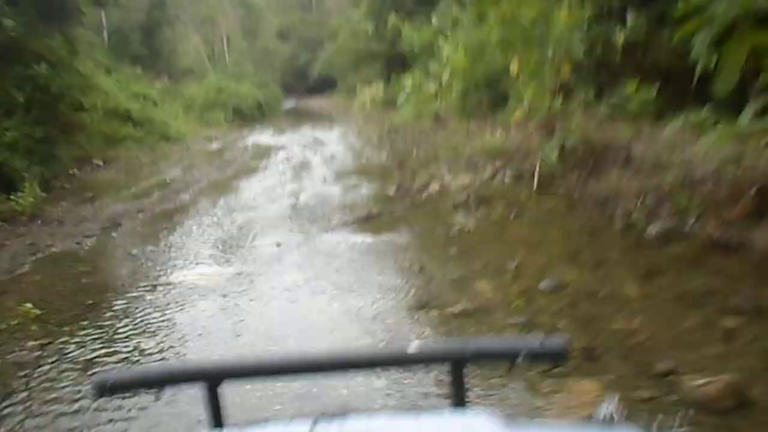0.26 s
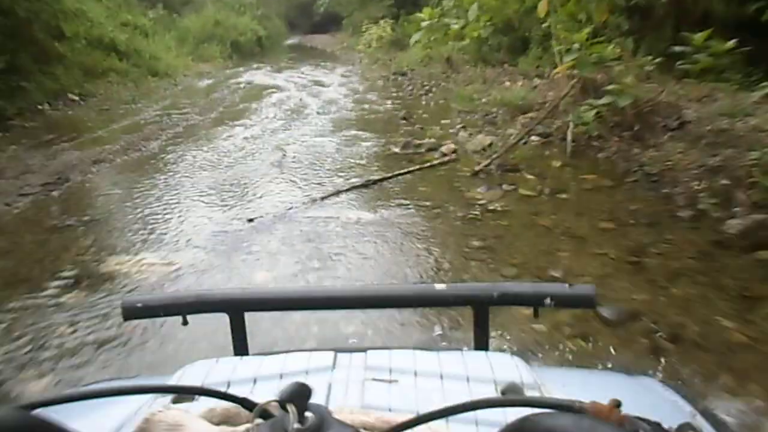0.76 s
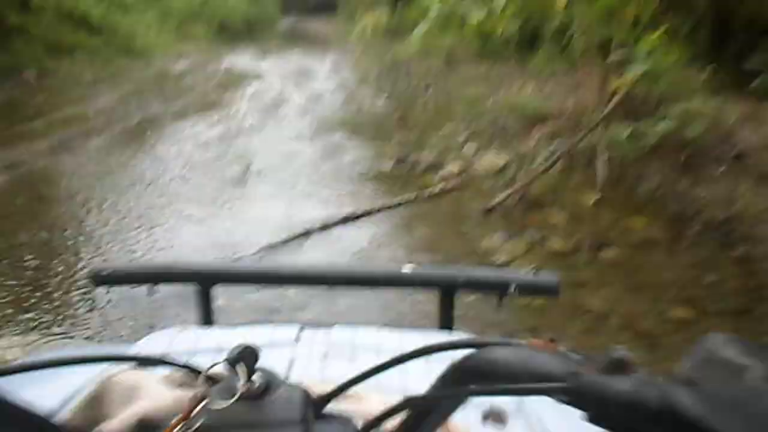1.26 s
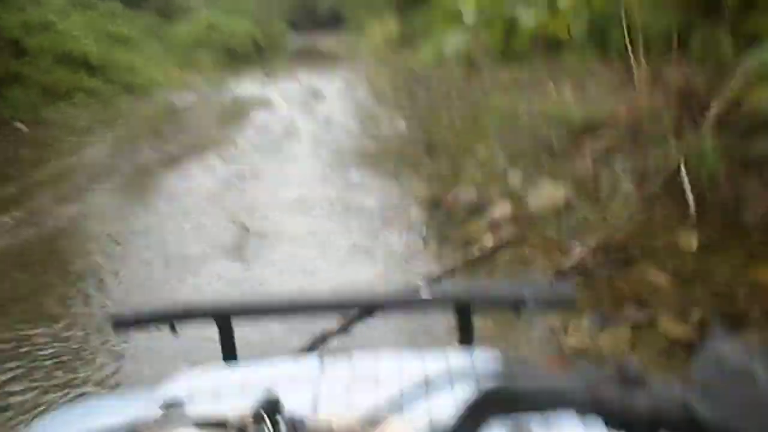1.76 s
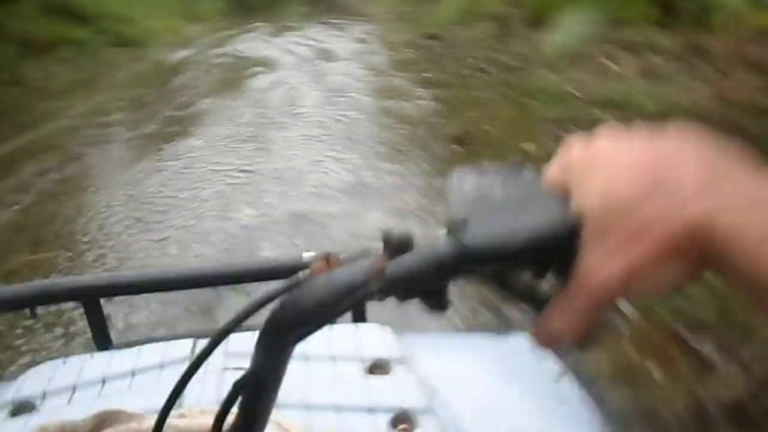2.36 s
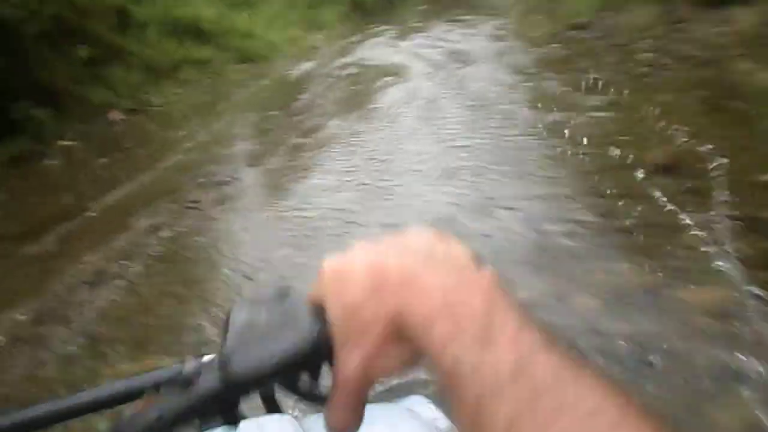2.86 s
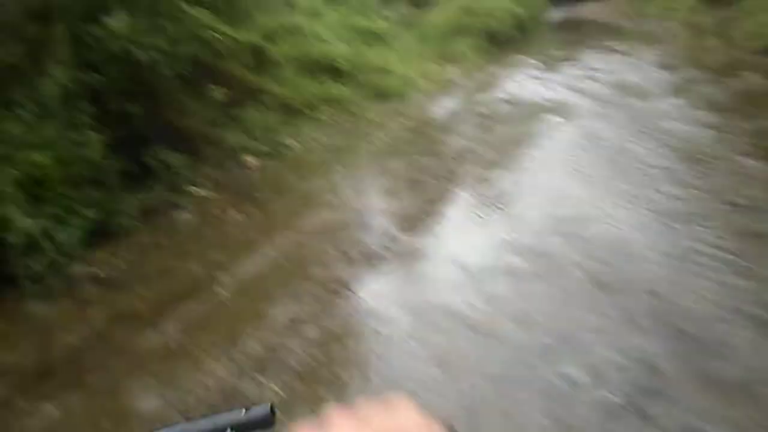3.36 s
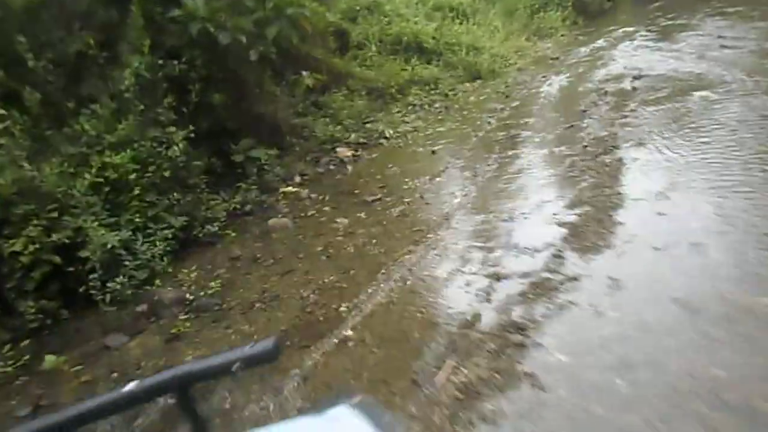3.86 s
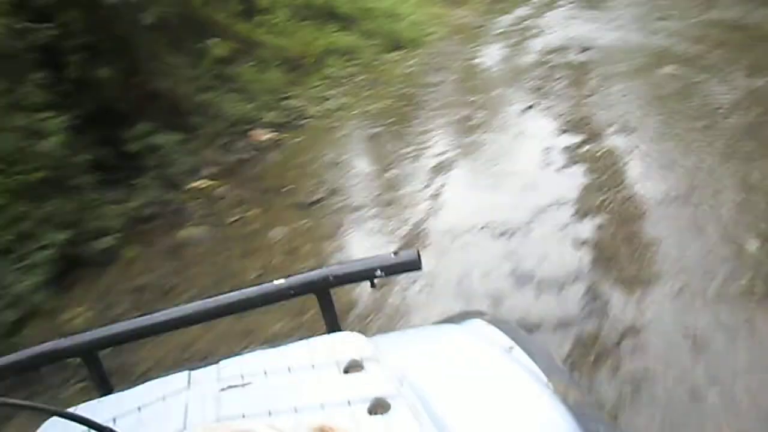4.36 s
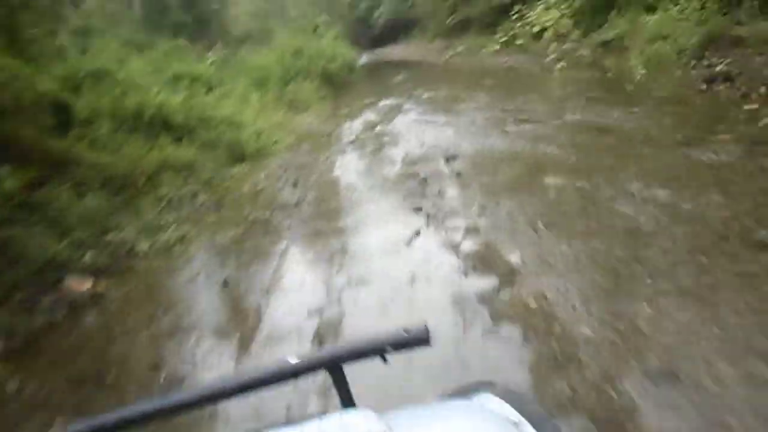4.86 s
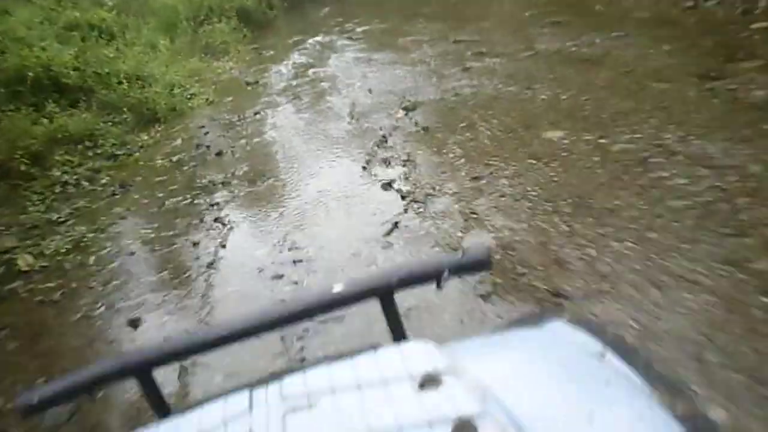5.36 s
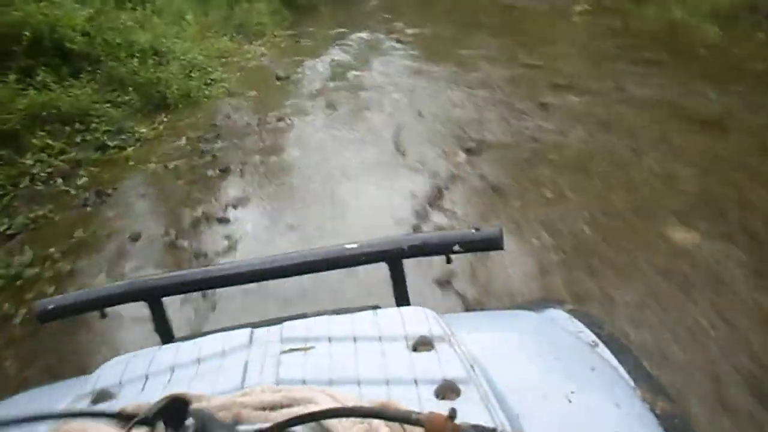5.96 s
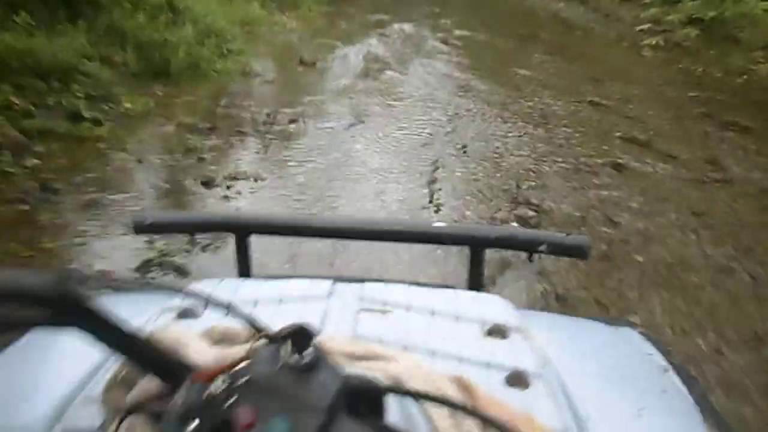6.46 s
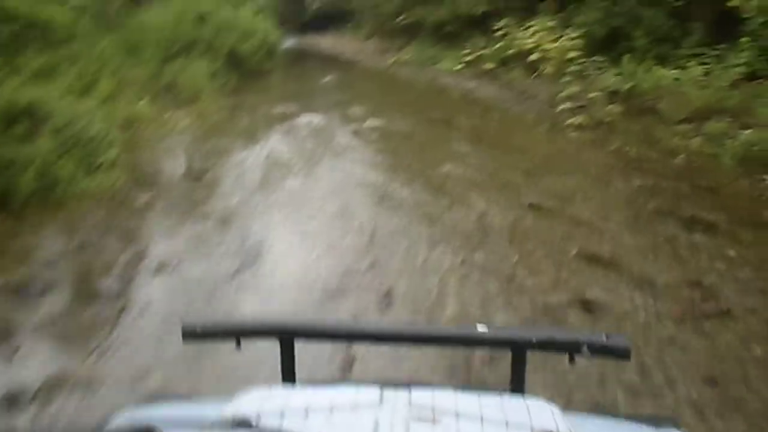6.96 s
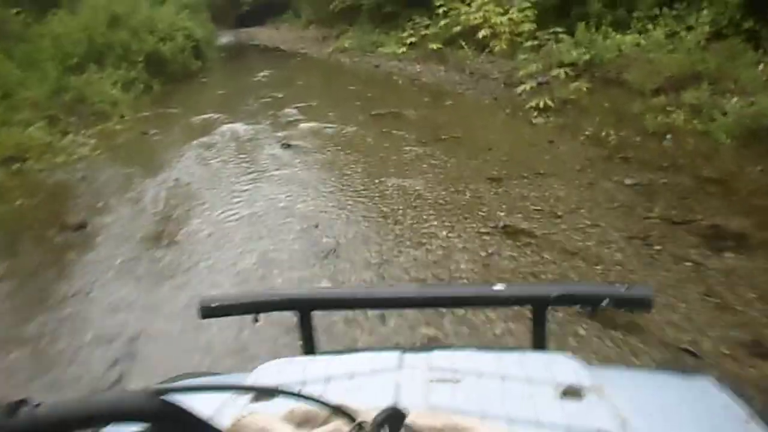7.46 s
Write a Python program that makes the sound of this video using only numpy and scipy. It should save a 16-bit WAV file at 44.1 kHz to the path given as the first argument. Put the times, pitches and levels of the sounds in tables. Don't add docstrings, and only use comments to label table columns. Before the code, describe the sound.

A quad bike's single-cylinder engine putters steadily at low pace, its revs dipping and surging, with valve clatter, bumps and brief metallic rattles.

```python
import sys
import numpy as np
from scipy import signal
from scipy.fft import rfft, irfft
from scipy.io import wavfile
from scipy.ndimage import uniform_filter1d

SR = 44100
rng = np.random.default_rng(int(sys.argv[2]) if len(sys.argv) > 2 else 0)


def elevation(decibels):
    levels = np.asarray(decibels, float)
    return 10 ** (levels / 20)


def log_audio(samples):
    frames = np.atleast_2d(samples).T
    limited = np.clip(frames, -1, 1)
    pcm = np.round(limited * 32767).astype(np.int16)
    wavfile.write(sys.argv[1], SR, pcm)


N = 340011
SECONDS = np.arange(N) / SR
FIRING_MS = np.arange(SR // 10) * 1000 / SR
CRUISE_HZ = 24


def unit(x):
    return x / np.sqrt(np.mean(x ** 2))


def curve(table):
    s, value = np.transpose(table)
    return np.interp(SECONDS, s, value)


def wave(t, at, width):
    return np.exp(-.5 * ((t - at) / width) ** 2)


def hump(s, half):
    return wave(SECONDS, s, half)


def ring(strikes, modes):
    out = 0
    for row, (hz, width, db) in zip(strikes, modes):
        peak = signal.iirpeak(hz, hz / width, SR)
        once = signal.lfilter(*peak, row)
        out = out + elevation(db) * signal.lfilter(*peak, once)
    return out


def coloured(spectrum):
    hz, db = np.transpose(spectrum)
    axis = np.log(np.arange(1, N // 2 + 2) * SR / N)
    gain = elevation(np.interp(axis, np.log(hz), db))
    return unit(irfft(rfft(rng.standard_normal(N)) * gain, N))


def grit(spread_db):
    return unit(rng.standard_normal(N) * elevation(spread_db * rng.exponential(size=N)))


def law(shut_db, db_per_pressure, db_per_hz, blow_db, hz):
    return shut_db + db_per_pressure * elevation(blow_db) + db_per_hz * (hz - CRUISE_HZ)


# [t/s, firing rate f/Hz]
CRANK_SPEED = [(0.0, 26.358), (0.681, 25.509), (0.881, 21.004), (2.222, 20.499), (2.407, 23.221),
               (3.574, 24.975), (4.054, 22.58), (4.764, 27.308), (4.838, 26.711), (4.999, 22.279),
               (5.613, 20.697), (6.815, 23.007), (6.978, 22.425), (7.72, 24.122)]
# [t/s, change of firing rate f/Hz]
WHEEL_SLIPS = [(1.281, 1.207), (1.702, -0.853), (1.946, 0.64), (2.587, 2.893), (2.832, -2.674),
               (3.014, 1.071), (3.441, 3.15), (5.315, 0.781), (5.769, -0.675), (6.359, -2.11),
               (7.405, 1.367)]


def firing_rate():
    slip_s = .08
    return curve(CRANK_SPEED) + sum(change * hump(s, slip_s) for s, change in WHEEL_SLIPS)


# [t/s, blowdown level/dB]
LEVER = [(0, -6.5), (1.3, -6), (2.4, -3.5), (3.6, -6), (4.4, -0.8), (4.8, -2.5), (5.05, -13), (5.75, -8),
         (5.9, -9), (6.02, -3), (6.5, -3), (6.9, -6.5), (7.72, -7)]
# [start t/s, length t/s, drop level/dB]
THUMB_LIFTS = [
    (0.685, 0.41, 10),
    (1.53, 0.13, 5.5),
    (1.856, 0.39, 4),
    (2.64, 0.19, 5.5),
    (4.91, 0.19, 4),
    (6.15, 0.22, 8.5),
]


def throttle():
    thumb_s = 0.15
    level_db = curve(LEVER)
    for s, length, drop_db in THUMB_LIFTS:
        inside = np.minimum(SECONDS - s, s + length - SECONDS)
        level_db = level_db - drop_db * np.clip(inside / thumb_s + .5, 0, 1)
    return level_db


# [t/ms after the cycle starts, width t/ms, size: + pressure, - suction]
BLOWDOWN_WAVES = [
    (5.74, 1.65, -0.12),
    (9.73, 1.05, -0.41),
    (14.53, 1.35, 0.52),
    (19.29, 1.74, -0.23),
    (28, 3.6, -0.064),
]


def blowdown(fast_hz, uneven, c):
    misfire_db, rebound_db_per_hz = -4, -1.6
    out = 0
    for k, (at, width, size) in enumerate(BLOWDOWN_WAVES):
        level_db = .6 * uneven * c[k]
        if k == 3:
            level_db += rebound_db_per_hz * fast_hz
        if k in (2, 3):
            level_db += misfire_db * (uneven - 1)
        out = out + size * elevation(level_db) * wave(FIRING_MS, at + .05 * c[5 + k], width)
    return out


# [share of the cycle from its start, width t/ms, size]
STROKE_WAVES = [
    (.0, 1.48, 0.51),
    (0.108, 1.82, -0.58),
]


def exhaust_stroke(hz, uneven, c):
    begin_ms = 16.2 + 119 / hz + .1 * uneven ** 2 * c[9]
    return sum(size * wave(FIRING_MS, begin_ms + 1000 * share / hz, width * uneven ** 0.27)
               for share, width, size in STROKE_WAVES)


# [f/Hz, level/dB, t60 t/s]
HEADER_RINGS = [(284.6, -16, 0.054), (392, -13.5, 0.04)]
HEADER_RISE = (2, 0.1)
# [f/Hz, level/dB, t60 t/s]
SILENCER_RINGS = [(320.4, 15, 0.095), (490, 5.5, 0.11), (644.5, -0.5, 0.096), (878, -8, 0.066)]
PITCH_FOLLOW = (0.82, 0.17, 0.74, 0.85, .78, 0.95)


def pipe_rings(hz, blow_db, shell_db, c):
    after = np.maximum(FIRING_MS - 8.5, 0) / 1000
    swell = 1 - np.exp(-(after / .003) ** 2)
    levels = [blow_db + rise * (hz - CRUISE_HZ) for rise in HEADER_RISE] + [shell_db] * len(SILENCER_RINGS)
    out = 0
    for k, ((f, db, t60), level) in enumerate(zip([*HEADER_RINGS, *SILENCER_RINGS], levels)):
        pitch = f * (hz / CRUISE_HZ) ** PITCH_FOLLOW[k]
        tone = np.sin(2 * np.pi * pitch * (after + .0005) + .2 * c[16 + k])
        out = out + elevation(db + level + 1.3 * c[10 + k] - 60 * after / t60) * tone
    return -swell * out


# [t/s, drop of the stroke level/dB]
CAMERA_SHADE = [(0, .3), (.75, -2.5), (.95, 2.5), (1.25, .2), (2.1, 2.7), (2.6, 2), (3.4, 3.5), (3.65, 1.5),
                (4.2, -1.5), (4.6, 4.5), (4.9, -0.5), (5.75, 0.5), (6.1, -2), (6.55, -1), (7.72, -4.5)]


def exhaust(turns, hz, blow_db):
    shade_db = curve(CAMERA_SHADE)
    stroke_db = -11.5 - shade_db
    shell_db = law(-47.5, 9.9, 0.91, blow_db, hz) - 1.7 * shade_db
    starts = np.flatnonzero(np.diff(np.floor(turns)) > 0)
    chance = np.sqrt(3) * uniform_filter1d(rng.standard_normal((len(starts), 24)), size=3, axis=0)
    out = np.zeros(N + SR)
    for i, c in zip(starts, chance):
        uneven = 1 + np.clip(-12 - blow_db[i], 0, 6) / 2
        firing = elevation(blow_db[i] + .6 * c[22]) * blowdown(hz[i] - CRUISE_HZ, uneven, c)
        firing = firing + elevation(stroke_db[i] + .7 * uneven * c[23]) * exhaust_stroke(hz[i], uneven, c)
        firing = firing + pipe_rings(hz[i], blow_db[i], shell_db[i], c)
        out[i:i + len(firing)] += firing
    return out[:N]


# [share of the cycle, length share, casing level/dB, hiss level/dB]
VALVE_KNOCKS = [
    (.17, .05, -1, -2),
    (.55, .09, -4, 0),
    (.78, .075, 4.5, 1),
]


def knocks(turns, column, bed_db, scatter_db):
    chance = rng.standard_normal((int(turns[-1]) + 2, len(VALVE_KNOCKS)))
    out = elevation(bed_db)
    for k, valve in enumerate(VALVE_KNOCKS):
        since = turns + 1 - valve[0]
        force = elevation(valve[column] + scatter_db * chance[since.astype(int), k])
        out = out + force * np.exp(-(since % 1) / valve[1])
    return unit(uniform_filter1d(out, size=70))


# [f/Hz, width f/Hz, level/dB]
CASING_MODES = [(2390, 367, -6), (2663, 515, -4), (3445, 220, -0.5), (3750, 820, -7.5), (4480, 300, -13),
                (4935, 500, -10.5), (5874, 1030, -6.5), (6840, 400, -20)]
# [f/Hz, level/dB per Hz]
VALVE_HISS = [(5500, -46.5), (6700, -3.5), (7100, -6), (7650, -2.5), (8400, -7), (9800, -11.5),
              (10600, -15.5), (12400, -16), (14000, -64.5)]
# [f/Hz, level/dB per Hz]
GAS_RASP = [(100, -3.5), (220, -5.5), (320, -1.5), (450, -12), (600, -13), (790, -16), (950, -20),
            (1280, -19), (1550, -26.5), (1850, -32.5), (2300, -31), (4000, -80.5)]
# [f/Hz, level/dB per Hz]
SLOW_SWELL = [(.5, -13.5), (3, 1.5), (10, -3), (25, -18), (60, -59)]


def mechanics(turns, hz, blow_db):
    drift_db, jostle_db = 0.74, 0.61
    strikes = []
    for _ in CASING_MODES:
        drift = elevation(drift_db * coloured(SLOW_SWELL))
        bed_db = -3 + .35 * blow_db
        strikes.append(grit(.9) * drift * knocks(turns, column=2, bed_db=bed_db, scatter_db=1.7))
    casing = elevation(law(-49, 3.04, .21, blow_db, hz)) * unit(ring(strikes, CASING_MODES))
    hiss = coloured(VALVE_HISS) * knocks(turns, column=3, bed_db=-9, scatter_db=2.5)
    hiss = elevation(law(-61.5, 11.4, 0.36, blow_db, hz)) * hiss
    port_open = unit(1.4 + wave(turns % 1, .33, .12))
    rasp = elevation(law(-39, 3.6, .22, blow_db, hz)) * coloured(GAS_RASP) * port_open
    return elevation(jostle_db * coloured(SLOW_SWELL)) * (casing + hiss + rasp)


# [middle t/s, half length t/s, level/dB]
STONY_STRETCHES = [
    (0.096, 0.44, -25.5),
    (1.6, 0.6, -31.5),
    (3.15, 0.37, -25.5),
]
# [t/s, f/Hz, peak level/dB, t60 t/s]
STONE_BOUNCE = (2.192, 11.4, -7.5, 1.5)


def frame():
    stony = elevation(-41.5)
    stony = stony + sum(elevation(db) * hump(s, half) for s, half, db in STONY_STRETCHES)
    shake = stony * coloured([(2, -30), (7, -2), (15, 0), (32, -1), (45, -9), (90, -17), (200, -40), (600, -90)])
    s, hz, db, t60 = STONE_BOUNCE
    since = np.maximum(SECONDS - s, 0)
    bounce = np.sin(2 * np.pi * hz * since) * elevation(db - 60 * since / t60)
    slam = wave(since, .035, .005) - wave(since, .047, .007)
    return shake + bounce + .3 * slam


# [t/s, half length t/s, level/dB,
# multiple of the firing rate]
SHELL_HOWL = [
    (0, .15, -44.5, 12),
    (2.45, .12, -36, 13),
    (3.48, .09, -39, 12),
    (4.68, .11, -34.5, 12),
    (6.85, .2, -40, 13),
]


def shell_howl(turns):
    waver = coloured([(1, -3.5), (12, 12.5), (60, -41.5), (200, -54.5)])
    howl = sum(elevation(db) * hump(s, half) * np.sin(2 * np.pi * multiple * turns)
               for s, half, db, multiple in SHELL_HOWL)
    return elevation(3 + 1.5 * waver) * howl


# [t/s, peak level/dB, length t/s]
KEY_JOLTS = [(.3615, -25, .005), (.3665, -21, .016), (.412, -28, .008), (.4262, -22, .007),
             (1.517, -24, .005), (1.5215, -19, .016), (2.221, -24, .008), (2.2265, -18, .012),
             (2.2635, -22, .006), (2.2745, -21, .007), (2.321, -25, .007), (2.333, -24, .016),
             (2.363, -25, .02), (2.531, -29, .006)]
# [f/Hz, width f/Hz, level/dB]
KEY_MODES = [(814, 430, 2), (2333, 390, 1), (2840, 330, 5.5), (3330, 120, 1), (3590, 240, 5),
             (4260, 970, -8.5), (6200, 760, -0.5), (7350, 890, -16.5)]


def rattles():
    push = np.zeros(N)
    for s, db, length in KEY_JOLTS:
        since = SECONDS - s
        push += np.clip(since / .0005, 0, 1) * elevation(db) * np.exp(-(since / length) ** 2)
    clicks = [grit(1.8) for _ in KEY_MODES]
    steady = np.std(ring(clicks, KEY_MODES))
    return elevation(-9) * ring([push * c for c in clicks], KEY_MODES) / steady


def scene():
    hz, blow_db = firing_rate(), throttle()
    turns = -.252 + np.cumsum(hz) / SR
    engine = exhaust(turns, hz, blow_db) + mechanics(turns, hz, blow_db)
    return (engine + frame() + shell_howl(turns) + rattles())[None]


def low_pass(x):
    return signal.sosfilt(signal.butter(12, 12380, fs=SR, output="sos"), x)


def record(dry):
    x = signal.sosfilt(signal.butter(1, 4, "high", fs=SR, output="sos"), dry)
    x = signal.sosfilt(signal.cheby2(10, 25, 10900, fs=SR, output="sos"), x)
    x = x * np.clip((N / SR - SECONDS) / .004, 0, 1)
    return low_pass(x)


dry = scene()
out = record(dry)
log_audio(out)
```